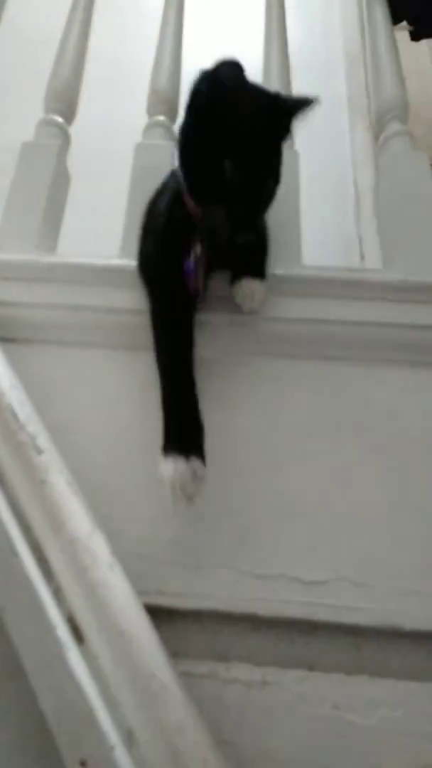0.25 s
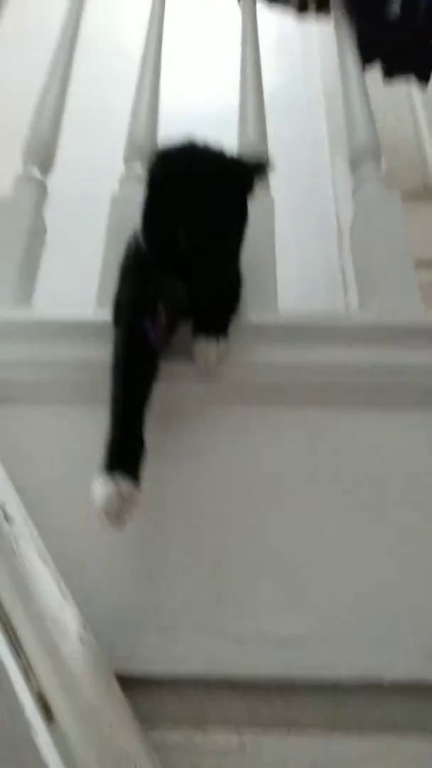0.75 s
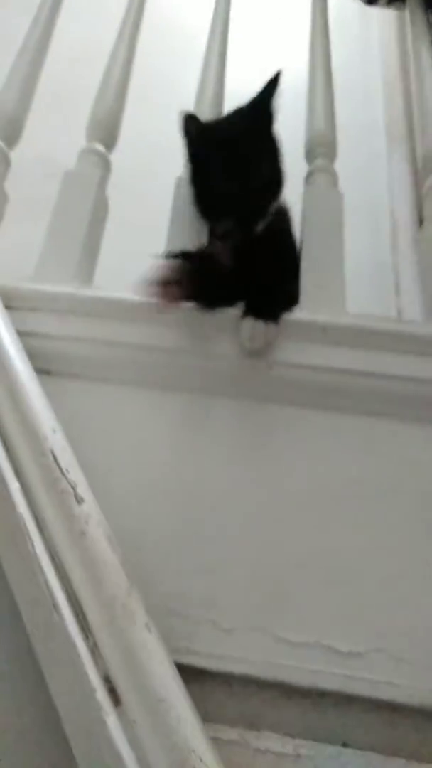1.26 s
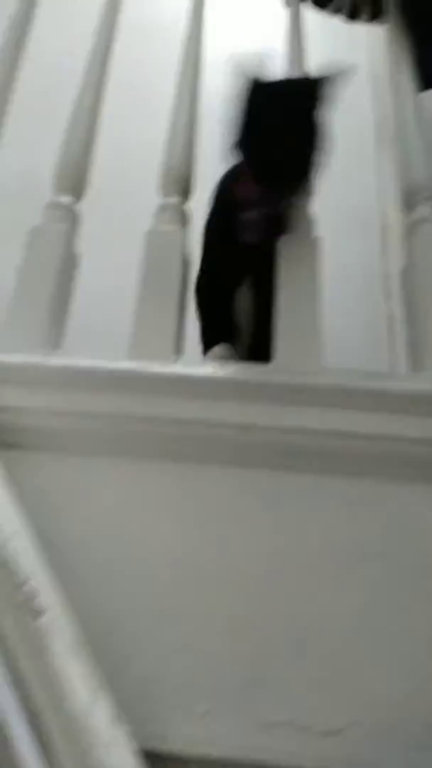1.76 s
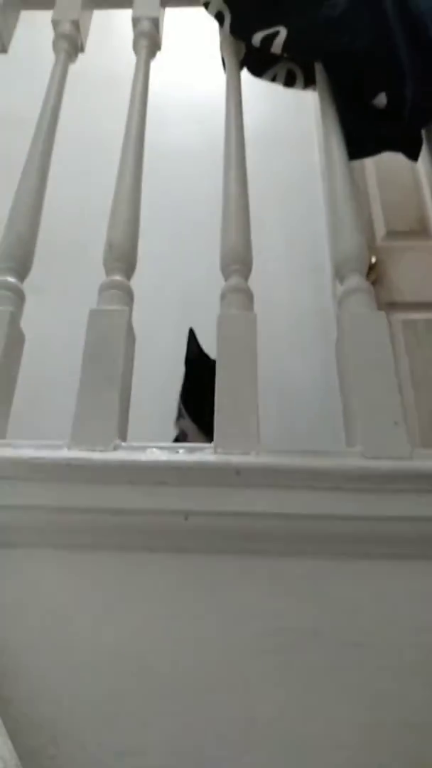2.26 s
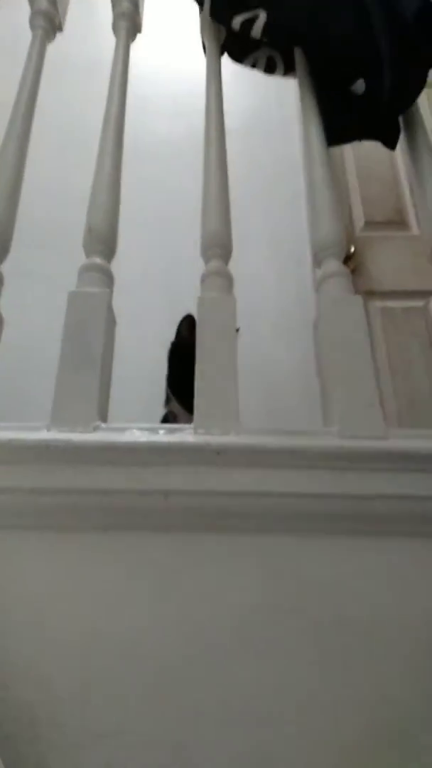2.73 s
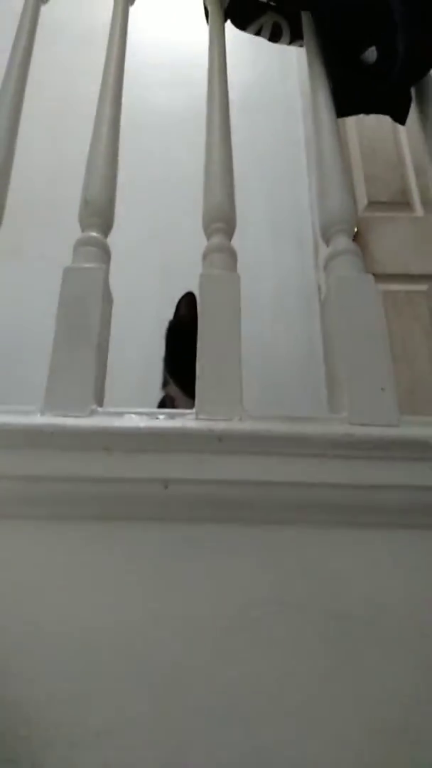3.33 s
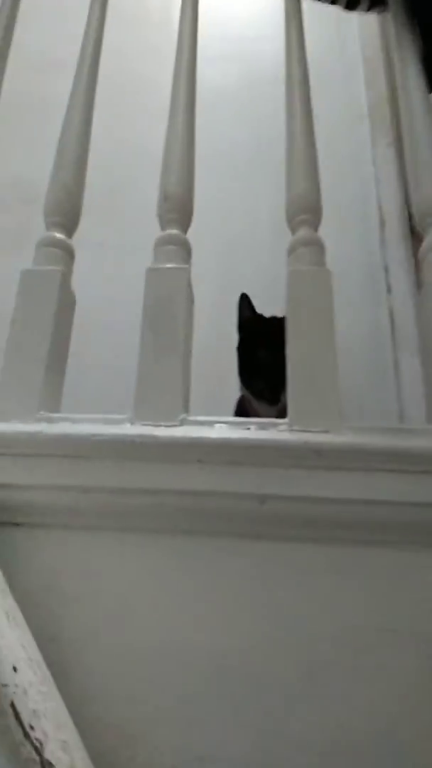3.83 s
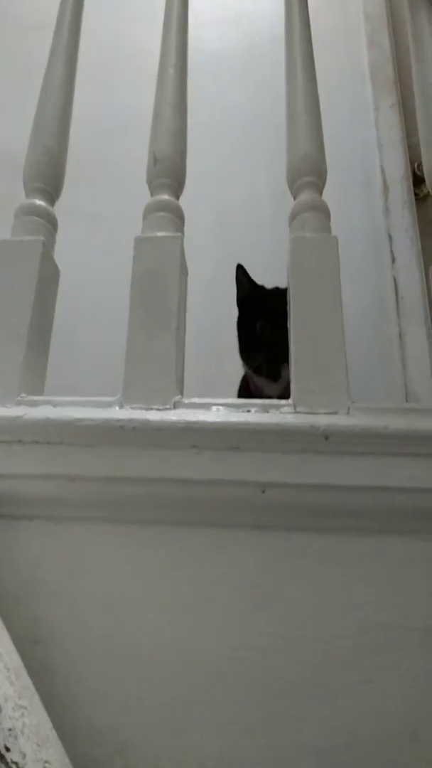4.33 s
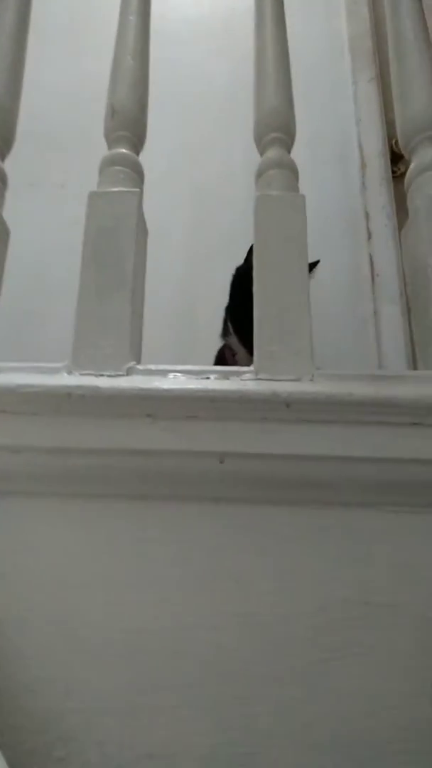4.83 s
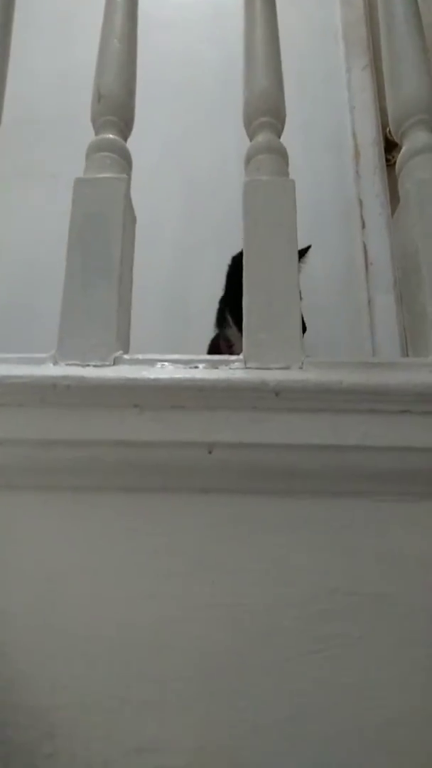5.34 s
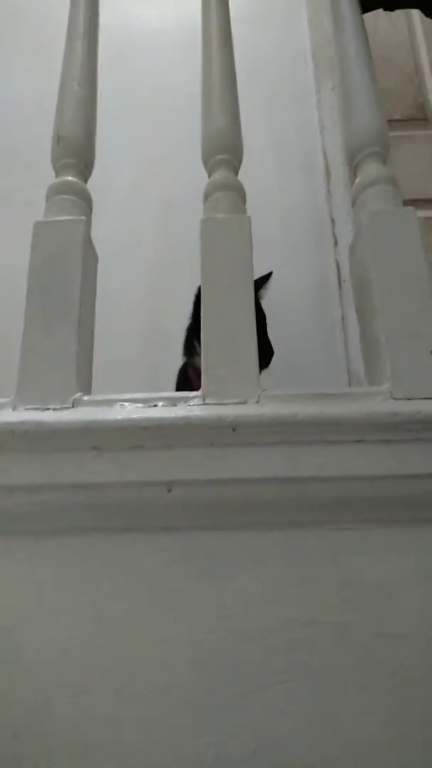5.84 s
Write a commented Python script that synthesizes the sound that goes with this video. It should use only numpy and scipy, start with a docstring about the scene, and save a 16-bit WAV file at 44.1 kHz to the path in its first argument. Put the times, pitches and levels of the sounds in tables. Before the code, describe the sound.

Quiet indoor room noise with a faint hum and microphone hiss runs for about six seconds. From the start, a cat's collar strap crackles very faintly. At 1.1 seconds the small metal bell on the collar gives a light, very high clink, followed by a few tinier ones. At about 1.9 seconds comes the loudest event: a quick, sharp jingle that briefly overloads the microphone, with the tag clacking against the bell and a soft bump on wood. Weaker clinks and a fur rustle fade by 2.3 seconds. Around 3 to 4.2 seconds, fur and cloth rustle softly, with small collar ticks, dull bumps and a claw tap. Between 4.9 and 5.8 seconds come several slightly sharper clicks, claw taps on the woodwork, more gentle bumps and rustling. Everything after the jingle is quiet, and the bare stairwell walls add a short reverberation.

```python
"""A small bell on a cat's collar clinks as the cat reaches through the banisters above a stairwell and
pulls back: a loose pellet strikes the shell and excites its modes, once so hard that the microphone
overloads. The name tag clacks against the bell, and the bare walls reverberate. Fur and cloth rustle by
friction, the collar ticks and crackles, and claw taps and dull bumps sound on the woodwork,
over quiet room noise, a faint hum and microphone hiss."""
import sys
import numpy as np
from scipy import signal
from scipy.fft import rfft, irfft
from scipy.io import wavfile

SR = 44100
rng = np.random.default_rng(int(sys.argv[2]) if len(sys.argv) > 2 else 0)


def wav_record(signal):
    """Record a signal, one row per channel, as 16-bit PCM in the file named by sys.argv[1]."""
    frames = np.transpose(np.atleast_2d(signal))
    bounded = np.clip(frames, -1, 1)
    # unit amplitude maps onto the largest positive 16-bit level
    quanta = np.round(bounded * 32767).astype(np.int16)
    wavfile.write(sys.argv[1], SR, quanta)


N = 268128
TIME = np.arange(N) / SR
BLOW_TIME = TIME[:SR * 3 // 4]


def gain_of(db):
    """The amplitude ratio of a level in decibels."""
    return 10 ** (np.asarray(db) / 20)


def unit_rms(x):
    """Normalisation to a mean power of 1."""
    return x / np.sqrt(np.mean(x ** 2) + 1e-20)


def curve_at(points, hz):
    """Interpolation on a logarithmic frequency axis."""
    point_hz, values = np.transpose(points)
    return np.interp(np.log(hz + 1), np.log(point_hz + 1), values)


def coloured(x, spectrum):
    """Spectral shaping: each frequency is weighted by a curve in dB; the result has rms 1."""
    gains = gain_of(curve_at(spectrum, np.fft.rfftfreq(len(x), 1 / SR)))
    return unit_rms(irfft(rfft(x) * gains, len(x)))


def resonate(x, hz, width_hz, order=1):
    """A broad resonance acts as a band-pass filter; a higher order steepens its skirts."""
    edges = np.hypot(hz, width_hz / 2) + np.array([-width_hz, width_hz]) / 2
    band = signal.butter(order, np.clip(edges, 10, SR / 2 - 10), "bandpass", fs=SR, output="sos")
    return signal.sosfilt(band, x)


def ringing(modes):
    """Free vibration: each mode is an exponentially damped sine."""
    return sum(gain_of(db - 60 * BLOW_TIME / t60) * np.sin(2 * np.pi * hz * BLOW_TIME)
               for hz, db, t60 in modes)


def add_blow(mix, start, sound, db):
    """Superposition: adds a blow with the energy of 25 ms at the level db."""
    part = mix[round(start * SR):][:len(sound)]
    part += (gain_of(db) * sound / np.sqrt(np.sum(sound ** 2) / (SR / 40)))[:len(part)]


def stairwell(wet_db):
    """Reverberation: dense reflections of energy wet_db, new at each call; the bass lasts longest."""
    # The walls' decay. Each row: frequency in Hz, reverberation time in seconds.
    decay_times = [(200, 0.49), (2000, 0.21), (8000, 0.24), (15000, 0.19)]
    n = len(BLOW_TIME)
    reflections = rng.choice([-1, 1], n) * (rng.random(n) < 1 / 6) * (BLOW_TIME > .002)
    hz, t, spectra = signal.stft(reflections, SR, nperseg=256)
    decay = gain_of(-60 * t / curve_at(decay_times, hz)[:, None])
    tail = signal.istft(spectra * decay, SR, nperseg=256)[1][:n]
    return gain_of(wet_db) * tail / np.linalg.norm(tail)


def scuff(t60, wet_db):
    """Broadband excitation: a rough contact gives a brief noise burst, followed by reflections."""
    contact = rng.standard_normal(len(BLOW_TIME)) * gain_of(-60 * BLOW_TIME / t60)
    return contact / np.linalg.norm(contact) + stairwell(wet_db)


def background(air_db=-63.5, hiss_db=-68.5):
    """The noise floor: room air, a far appliance's hum, and hiss peaking at the microphone's resonance."""
    # Two noise spectra. Each row: frequency in Hz, relative level in dB.
    air_spectrum = [(25, -34.5), (42, -27), (55, -5.5), (120, -7), (250, -3), (400, -5), (520, -10),
                    (690, -9), (900, -12), (1700, -13.5), (2600, -22), (3900, -46.5)]
    hiss_spectrum = [(1500, -40.5), (3000, -7.5), (4600, -6.5), (5700, -11.5), (6500, -14.5), (7400, -8.5),
                     (8650, 1), (9600, -7.5), (11000, -11), (15500, -10.5)]
    # The appliance's tones. Each row: frequency in Hz, rms level in dB.
    hum_tones = [(118.4, -79.5), (236.9, -77), (419.9, -74.5), (457.6, -82.5)]
    air = gain_of(air_db) * coloured(rng.standard_normal(N), air_spectrum)
    hiss = gain_of(hiss_db) * coloured(rng.standard_normal(N), hiss_spectrum)
    hum = sum(gain_of(db) * np.sqrt(2) * np.sin(2 * np.pi * (hz * TIME + rng.random()))
              for hz, db in hum_tones)
    return air + hiss + hum


def strap_crackle(creaks_per_s=22, db=-74, spread_db=4.0, hz=9300, width_hz=2600):
    """Random impulses: the collar's strap creaks faintly while the cat paws down the wall."""
    reaching = (TIME > .15) & (TIME < 1.8)
    sizes = gain_of(spread_db * np.minimum(rng.exponential(1, N), 3))
    creaks = sizes * (rng.random(N) < creaks_per_s / SR) * reaching
    contacts = signal.fftconvolve(creaks, scuff(t60=0.0054, wet_db=-6.5))[:N]
    return gain_of(db) * unit_rms(resonate(contacts, hz, width_hz, order=2))


def fur_rustle(slips_per_s=1000, catch_hz=70, catch_db=1.6, swell_db_per_s=331, fade_db_per_s=190.5):
    """Stick-slip friction: fur and cloth catch unevenly, in strokes that swell, hold and fade."""
    # The cat's movements. Each row: time of full speed and hold in seconds, hiss and body levels in dB.
    strokes = [(1.36, 0.44, -66.5, -74.5), (1.974, 0.081, -57, -62.5), (2.111, 0.039, -57.5, -56.5),
               (3.023, 0.07, -52, -61.5), (3.155, 0.0089, -53.5, -61), (3.202, 0.099, -63, -72.5),
               (3.5, 0.12, -66.5, -78), (3.757, 0.0095, -62.5, -73), (3.828, 0.02, -59.5, -68.5),
               (3.989, 0.048, -64, -71.5), (4.067, 0.011, -56, -75), (4.19, 0.061, -65.5, -77.5),
               (4.89, 0.22, -65.5, -67.5), (5.175, 0.055, -69.5, -63.5), (5.3, 0.051, -65.5, -66),
               (5.382, 0.093, -53.5, -59), (5.655, 0.016, -65.5, -62.5)]
    # The bright hiss and dull body of rubbing. Each row: frequency in Hz, relative level in dB.
    hiss_spectrum = [(2000, -23), (3000, -15.5), (4600, -8.5), (6200, -16.5), (7300, -9.5), (8100, 0.5),
                     (8900, 1), (10000, -5.5), (12000, -16), (15500, -21)]
    body_spectrum = [(60, -23), (280, 5.5), (600, -3), (1400, 0), (2200, -6), (3200, -23), (6000, -38)]
    sizes = gain_of(np.minimum(rng.exponential(1, N), 4))
    slips = unit_rms(sizes * rng.choice([-1, 1], N) * (rng.random(N) < slips_per_s / SR))
    lowpass = signal.butter(2, catch_hz, fs=SR, output="sos")
    catches = unit_rms(signal.sosfilt(lowpass, rng.standard_normal(N)))
    sliding = 0.94 * rng.standard_normal(N)
    friction = (slips + sliding) * gain_of(catch_db * catches)
    hiss_power, body_power = np.zeros((2, N))
    for onset, hold, hiss_db, body_db in strokes:
        swell_db = swell_db_per_s * np.maximum(onset - TIME, 0)
        fade_db = fade_db_per_s * np.maximum(TIME - onset - hold, 0)
        speed = gain_of(-swell_db - fade_db)
        hiss_power += (gain_of(hiss_db) * speed) ** 2
        body_power += (gain_of(body_db) * speed) ** 2
    hiss = coloured(friction, hiss_spectrum) * np.sqrt(hiss_power)
    body = coloured(friction, body_spectrum) * np.sqrt(body_power)
    return hiss + body


def wood_bumps(contact_t60=.05, relative_width=0.63):
    """Heavy damping: a soft push on the woodwork excites one low, broad resonance."""
    # Each row: start in seconds, level in dB, resonance in Hz.
    bumps = [(1.287, -57.5, 334), (1.783, -58, 270), (1.8628, -69, 800), (1.864, -49, 241),
             (1.868, -59.5, 66), (2.074, -55, 290), (2.237, -59, 110), (3.075, -55, 280), (3.1, -56, 250),
             (3.11, -60, 680), (3.164, -58.5, 620), (4.881, -55.5, 296), (4.926, -59.5, 290),
             (5.077, -57.5, 294), (5.35, -61, 88), (5.653, -60, 293)]
    out = np.zeros(N)
    for start, db, hz in bumps:
        contact = scuff(contact_t60, wet_db=-3.5)
        add_blow(out, start, resonate(contact, hz, hz * relative_width, order=2), db)
    return out


def claw_taps(contact_t60=.009, hollow_hz=1750, hollow_width_hz=690):
    """Impact excitation: the harder a claw taps the woodwork, the brighter the sound."""
    # Each row: start in seconds, level in dB, cutoff in Hz, hollow ring in dB, echo-to-direct ratio in dB.
    taps = [(1.424, -61, 4000, 3, -3), (3.664, -57, 1700, 10, -8), (5.074, -46.5, 8050, -10, -5),
            (5.104, -59.5, 4770, 0, 0)]
    # Four resonances of the wood, plus the microphone's bright peak near 8.7 kHz.
    # Each row: centre and width in Hz, relative level in dB.
    resonances = [(686, 630, 2.5), (1290, 390, -2), (4000, 960, 3), (5800, 940, 0), (8650, 980, 8.5)]
    out = np.zeros(N)
    for start, db, cutoff_hz, hollow_db, wet_db in taps:
        contact = scuff(contact_t60, wet_db)
        tap = np.zeros_like(contact)
        for hz, width_hz, mode_db in resonances + [(hollow_hz, hollow_width_hz, hollow_db)]:
            strength = gain_of(mode_db) / np.hypot(1, (hz / cutoff_hz) ** 3)
            tap += strength * unit_rms(resonate(contact, hz, width_hz, order=2))
        add_blow(out, start, tap, db)
    return out


def collar_ticks(contact_t60=0.011):
    """Resonant filtering: the fittings knock and snap; the microphone's resonance adds a bright top."""
    # Each row: start in seconds, then level, dull-to-bright ratio and echo-to-direct ratio in dB.
    ticks = [(0.852, -65, -10, -6), (1.138, -60, -5, 4), (1.8622, -45, -2.5, 8), (3.047, -59, -7, -7),
             (3.116, -57, -1.5, -3), (3.163, -59, -5.5, -2), (4.038, -62.5, -19, -9),
             (4.0638, -53, -13, -7), (4.079, -54, -22, -6.5), (4.872, -57, -6, 3), (4.8774, -42.5, -29, 1),
             (4.887, -50, -14, 3), (5.0334, -56.5, -4, 2), (5.2444, -58.5, -9, -3),
             (5.351, -55.5, -24, -10), (5.3731, -47.5, -13, 1), (5.385, -50.5, 4, -3),
             (5.4696, -52, -19, 7), (5.7636, -62, -6, -2)]
    # The knock, the snap and the microphone's peak. Each row: centre and width in Hz.
    resonances = [(1700, 3200), (4150, 1200), (8750, 1200)]
    knock, snap, microphone_peak = resonances
    out = np.zeros(N)
    for start, db, dull_db, wet_db in ticks:
        contact = scuff(contact_t60, wet_db)
        dull = unit_rms(resonate(contact, *knock, order=2)) + unit_rms(resonate(contact, *snap))
        bright = unit_rms(resonate(contact, *microphone_peak))
        add_blow(out, start, bright + gain_of(dull_db) * dull, db)
    return out


def name_tag(contact_t60=.003, wet_db=3):
    """Plate vibration: the flat tag strikes the bell and rings briefly, well below it in pitch."""
    # Each row: start in seconds, level in dB.
    clacks = [(1.8614, -42.5), (1.895, -44.5), (2.082, -68.5)]
    # The tag's modes. Each row: frequency in Hz, relative level in dB, 60 dB decay time in seconds.
    tag_modes = [(1980, -8.5, .006), (3260, -0.5, 0.007), (4250, 2, 0.0086)]
    out = np.zeros(N)
    for start, db in clacks:
        clack = signal.fftconvolve(ringing(tag_modes), scuff(contact_t60, wet_db))
        add_blow(out, start, clack[:len(BLOW_TIME)], db)
    return out


def bell(contact_s=0.00032, crack_t60=0.0061, crack_wet_db=8, crack_to_ring_db=-32.5):
    """Modal vibration: where the pellet lands sets the mix of the shell's modes; fur damps them quickly."""
    # The pellet's blows. Each row: start in seconds, then level, gain of the second mode,
    # gain of the high modes and echo-to-direct ratio, all in dB.
    clinks = [(1.138, -40, 3.5, -19, -11.5), (1.2925, -53.5, 6, -28, -7), (1.341, -61, 5, 6, -3),
              (1.384, -60.5, -2, -22, 3.5), (1.8625, -29, 1, 0, 5), (1.8685, -4.5, -14.5, -49, -2.5),
              (1.8772, -23, -17, -46, 2.5), (1.884, -8.5, -19.5, -50.5, 1), (1.936, -20, -17, -50, -2),
              (1.991, -41, 0, -32, 4), (2.034, -32, -11, -22, 1), (2.06, -41, -8, -26, 1),
              (2.158, -55.5, -9, -23, 0), (2.305, -62, -3.5, -24, 11)]
    # The shell's modes. Each row: frequency in Hz, relative level in dB, 60 dB decay time in seconds.
    low_modes = [(7997, -8.5, 0.089), (8060, -8, .06), (8050, -33.5, 0.5)]  # a split mode, of which a trace rings on
    second_mode = [(8880, 0, .032)]
    high_modes = [(10300, -12.5, 0.013), (13640, -8, .016), (14000, -9, .018), (14840, -8, .012)]
    # The pellet's contact noise. Each row: frequency in Hz, relative level in dB.
    crack_spectrum = [(500, -13), (2000, -6), (3200, 0.5), (4250, -0.5), (5200, -6.5), (9000, -1.5),
                      (10800, 7), (12500, 3), (15300, 13)]
    out = np.zeros(N)
    swell = 1 - np.exp(-BLOW_TIME / contact_s)  # the ring builds up while the pellet touches
    low, second, high = ringing(low_modes), ringing(second_mode), ringing(high_modes)
    for start, db, second_db, high_db, wet_db in clinks:
        ring = swell * (low + gain_of(second_db) * second + gain_of(high_db) * high)
        echoes = signal.fftconvolve(ring, stairwell(wet_db=0))[:len(BLOW_TIME)]
        add_blow(out, start, unit_rms(ring) + gain_of(wet_db) * unit_rms(echoes), db)
        crack = coloured(scuff(crack_t60, crack_wet_db), crack_spectrum)
        add_blow(out, start, crack[:len(BLOW_TIME) // 2], db + crack_to_ring_db)
    return out


def microphone_port(x, dip_hz=6200, dip_width_hz=1500, dip_depth=0.51, cutoff_hz=11800):
    """Acoustic filtering: the narrow port's response dips below its resonance and rolls off above it."""
    dipped = x - dip_depth * resonate(x, dip_hz, dip_width_hz)
    return signal.sosfilt(signal.butter(2, cutoff_hz, fs=SR, output="sos"), dipped)


def scene():
    """Superposition at one microphone, whose port colours the sharp impacts."""
    impacts = microphone_port(bell() + name_tag() + collar_ticks() + claw_taps())
    return (impacts + wood_bumps() + fur_rustle() + background() + strap_crackle())[None]


def record(dry):
    """Saturation: the input stage rounds off the loudest peaks; a low-pass then limits the band."""
    ceiling, edge_hz = .68, 15650
    oversampled = signal.resample_poly(dry, 4, 1, axis=1)  # keeps aliasing low
    saturated = oversampled / (1 + (oversampled / ceiling) ** 6) ** (1 / 6)
    rounded = signal.resample_poly(saturated, 1, 4, axis=1)
    lowpass = signal.firwin(511, edge_hz, window=("kaiser", 9), fs=SR)
    return signal.oaconvolve(rounded, lowpass[None], "same")


dry = scene()
out = record(dry)
wav_record(out)
```